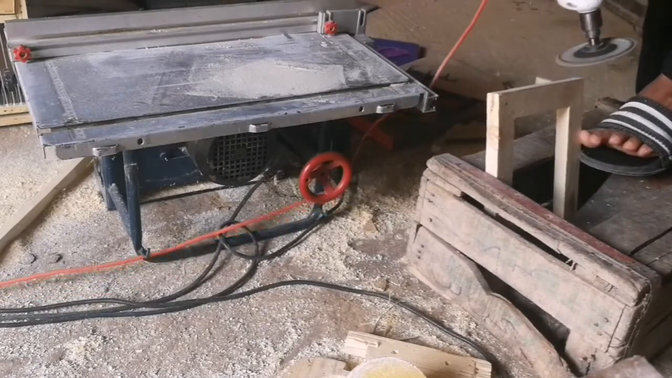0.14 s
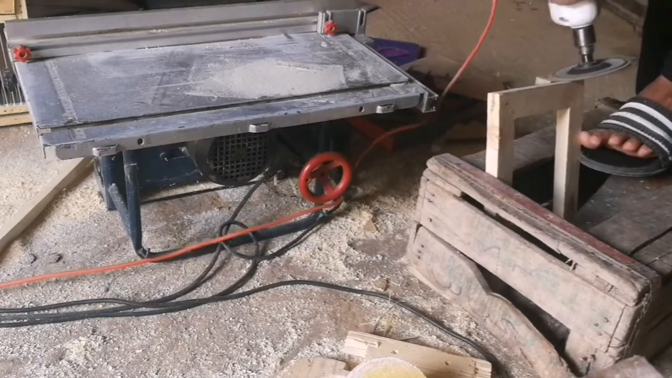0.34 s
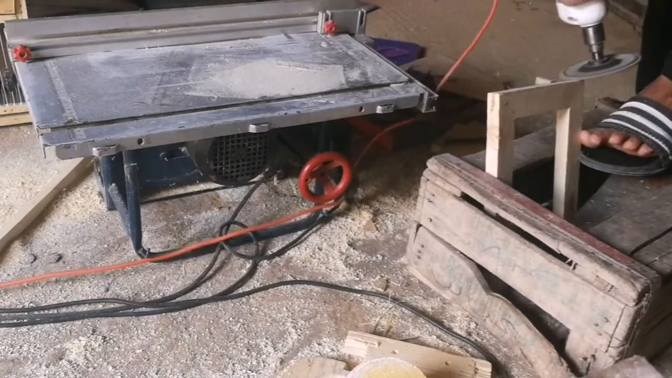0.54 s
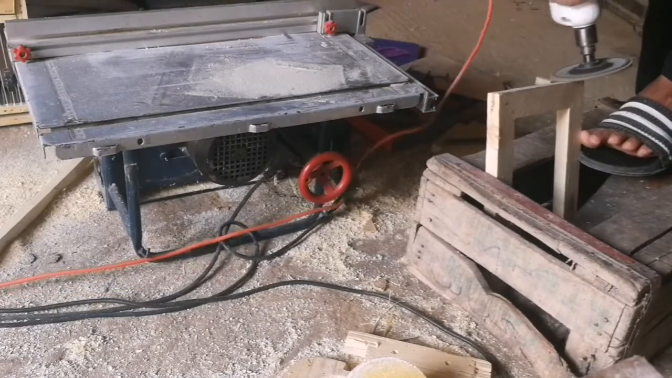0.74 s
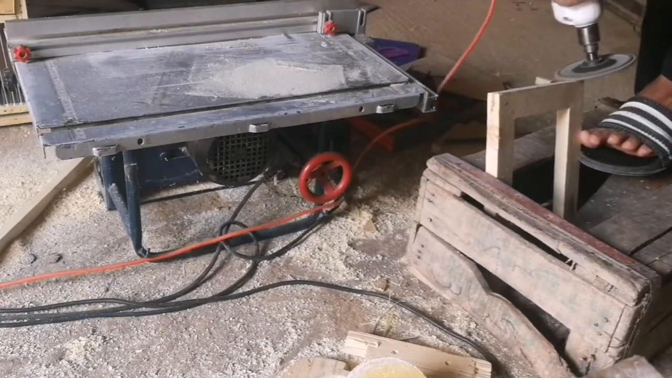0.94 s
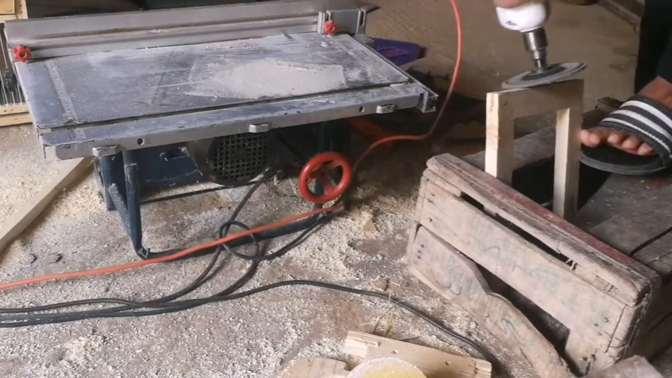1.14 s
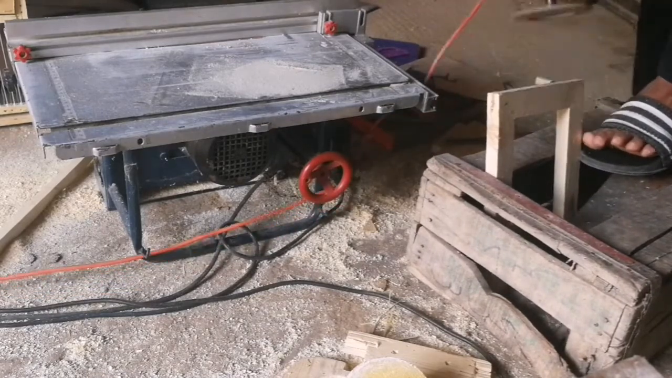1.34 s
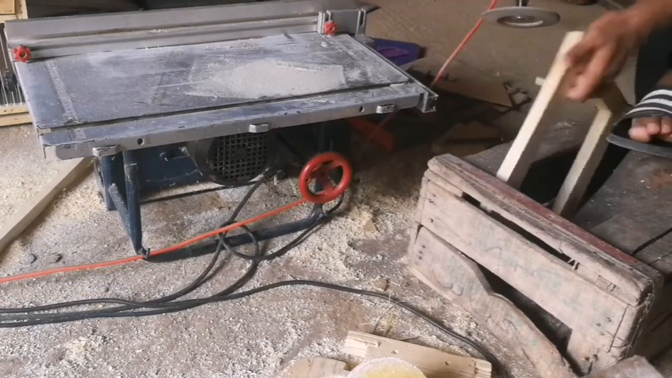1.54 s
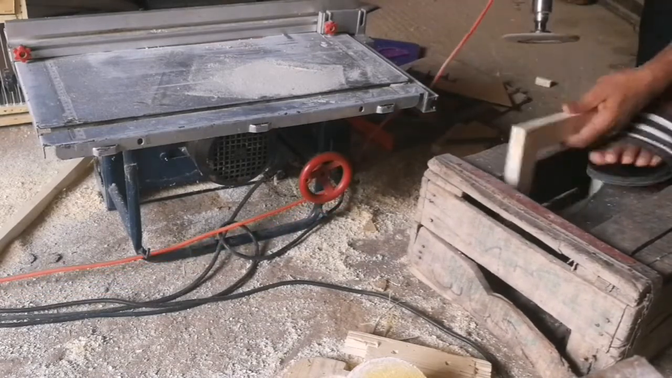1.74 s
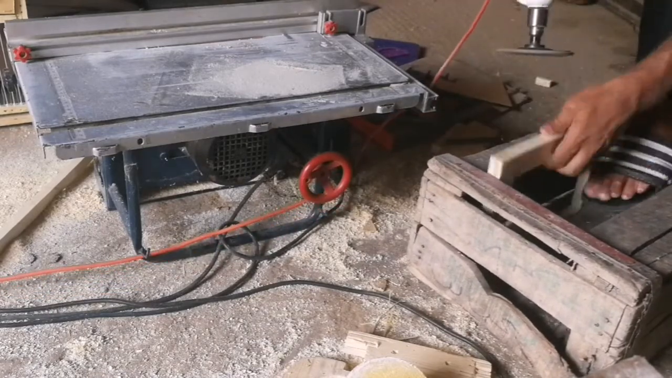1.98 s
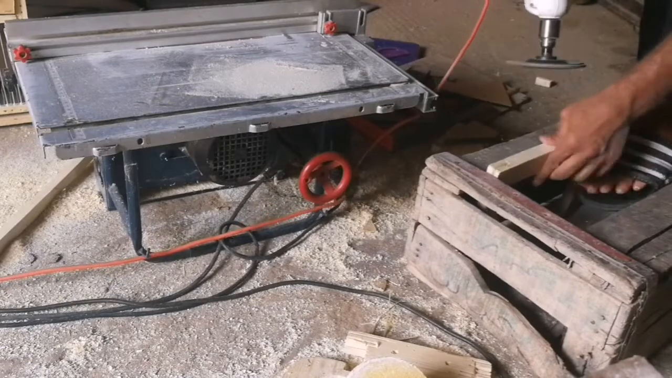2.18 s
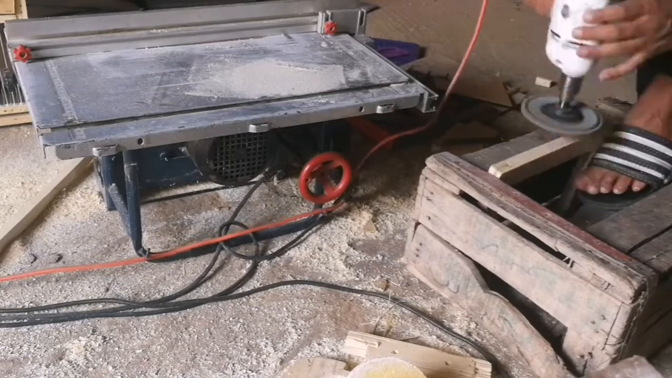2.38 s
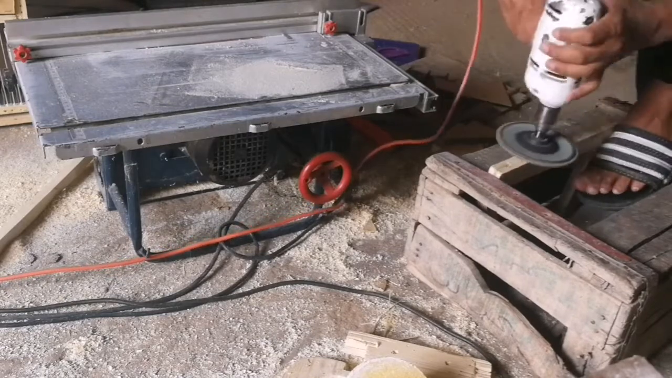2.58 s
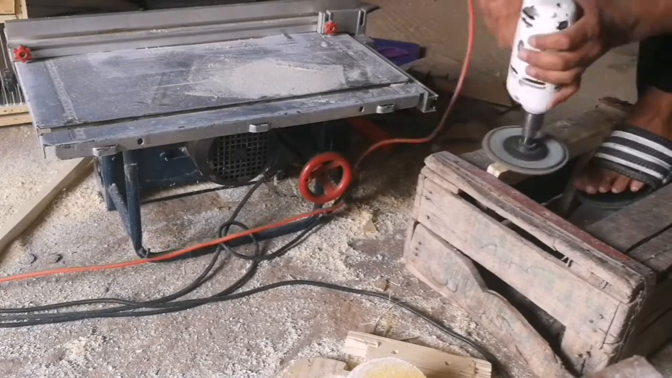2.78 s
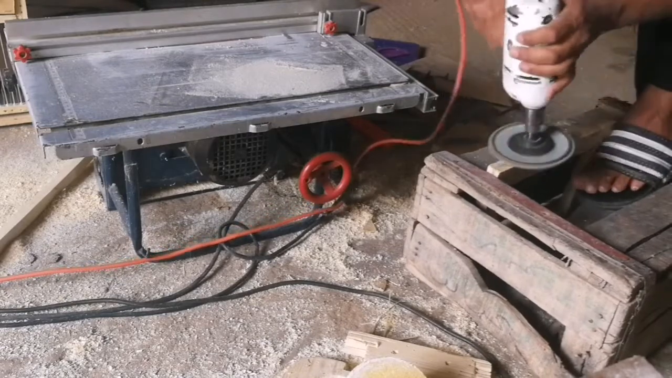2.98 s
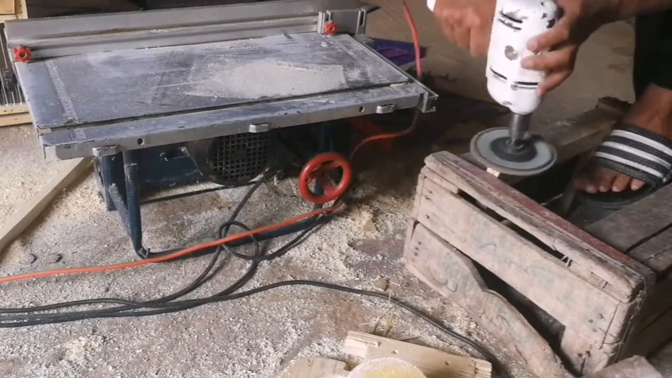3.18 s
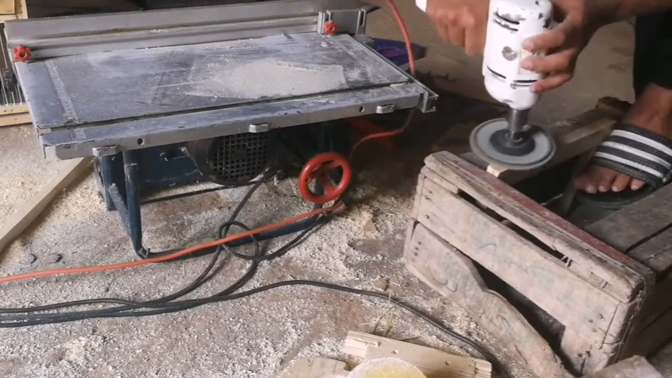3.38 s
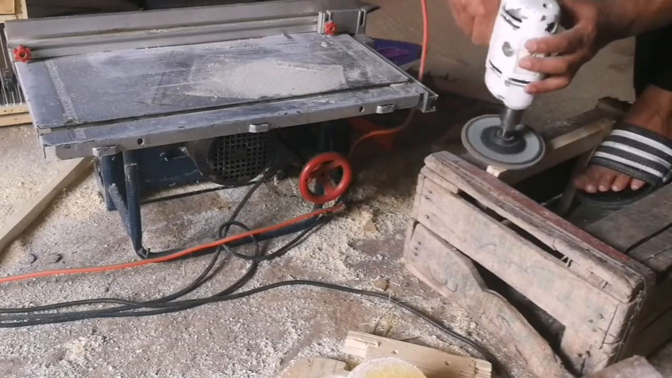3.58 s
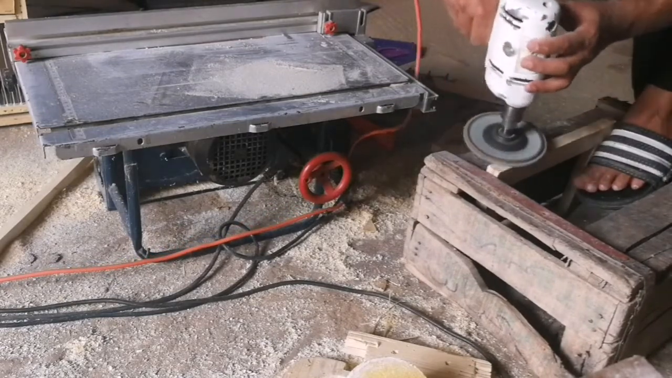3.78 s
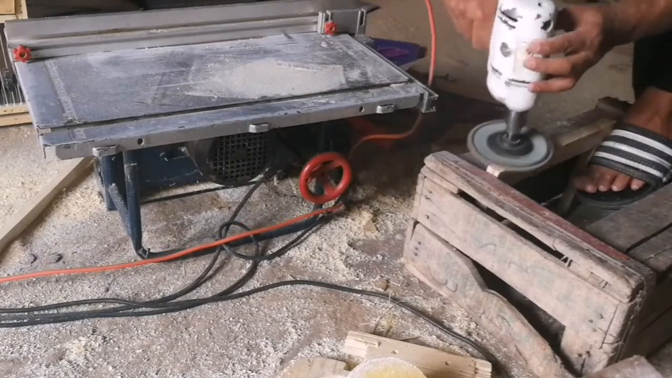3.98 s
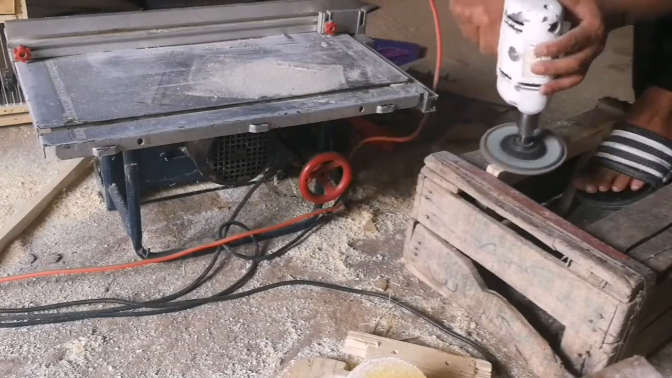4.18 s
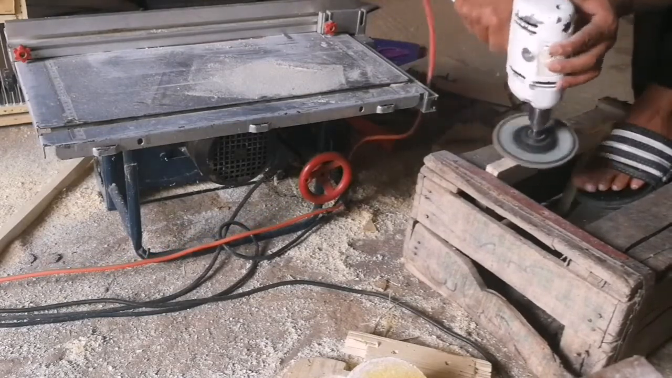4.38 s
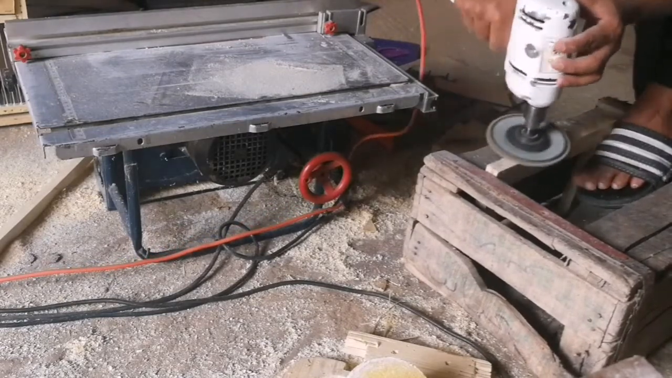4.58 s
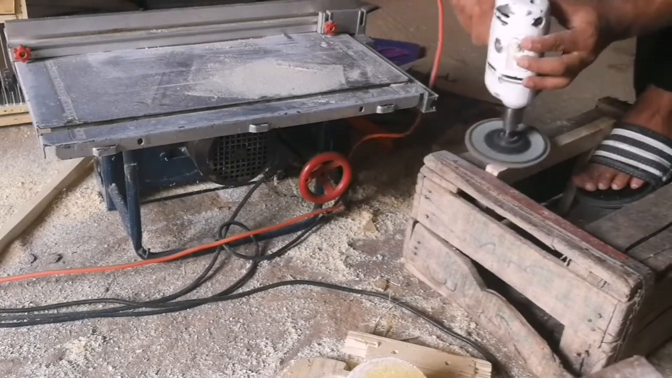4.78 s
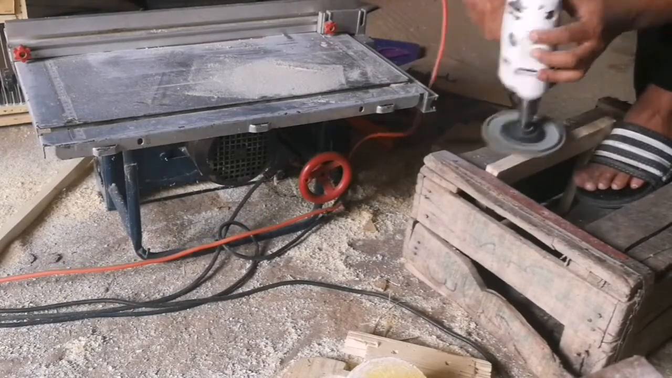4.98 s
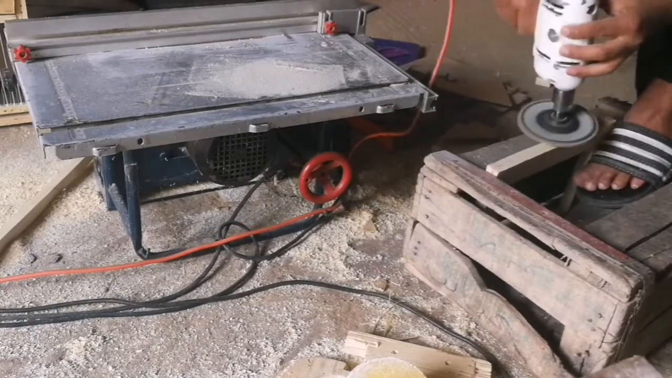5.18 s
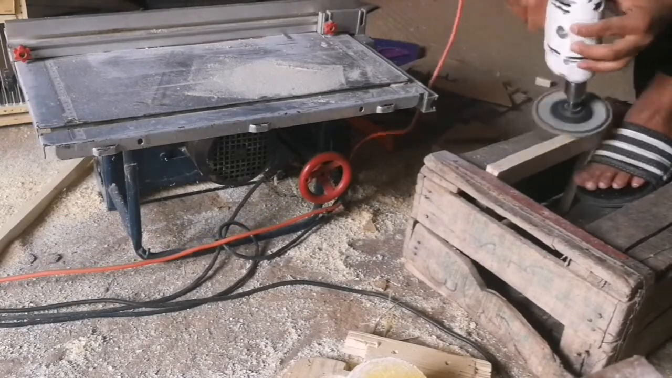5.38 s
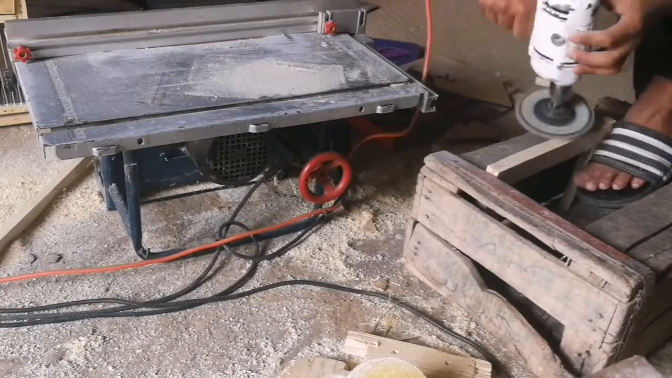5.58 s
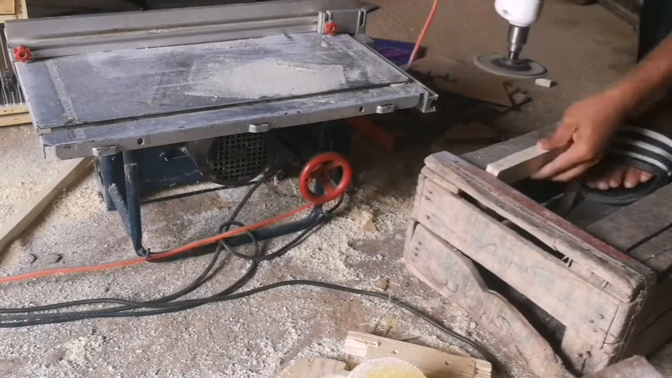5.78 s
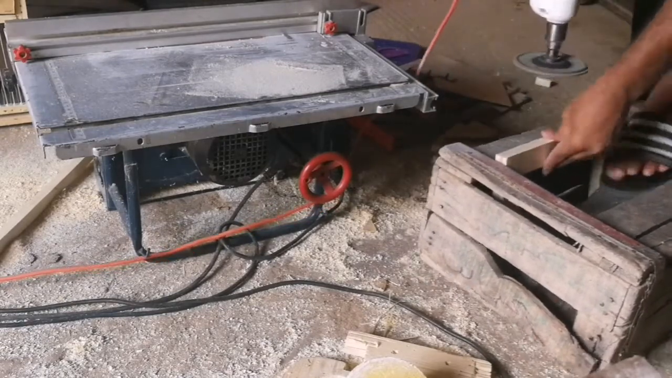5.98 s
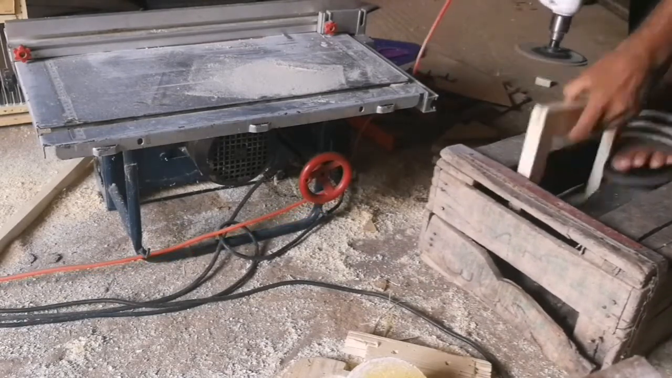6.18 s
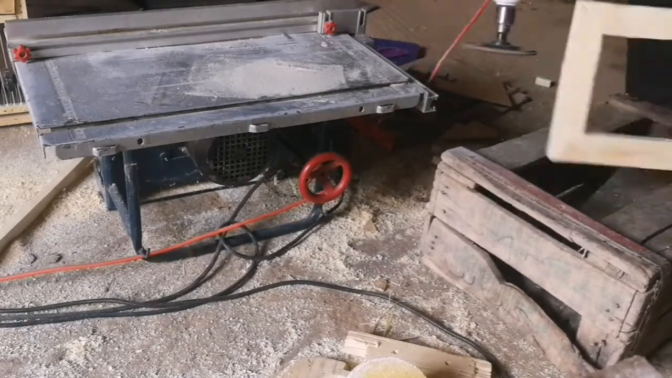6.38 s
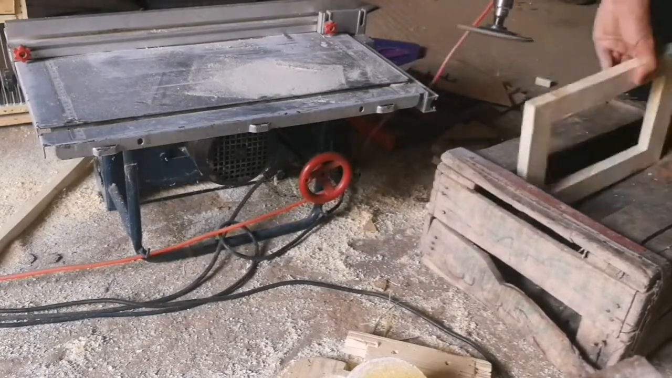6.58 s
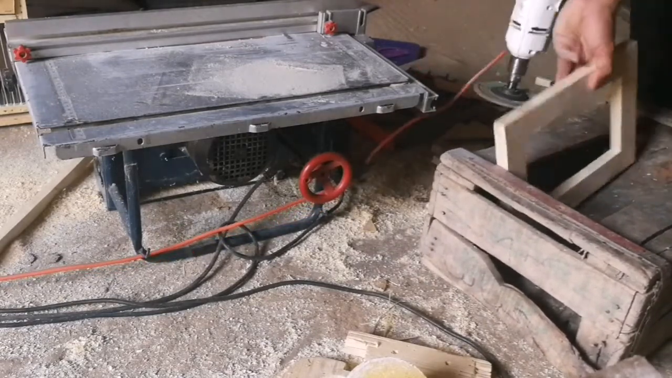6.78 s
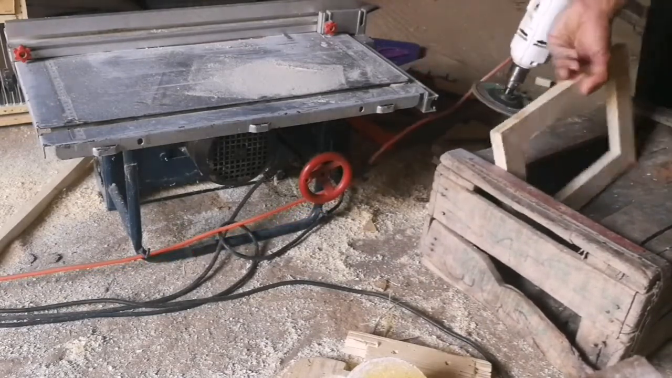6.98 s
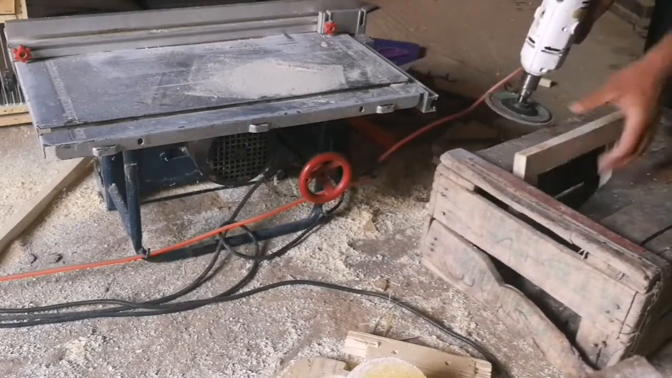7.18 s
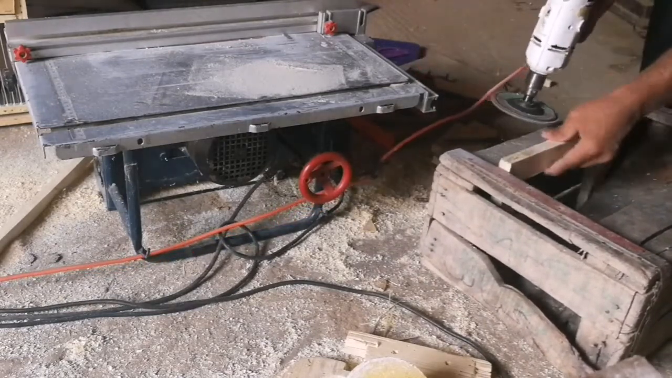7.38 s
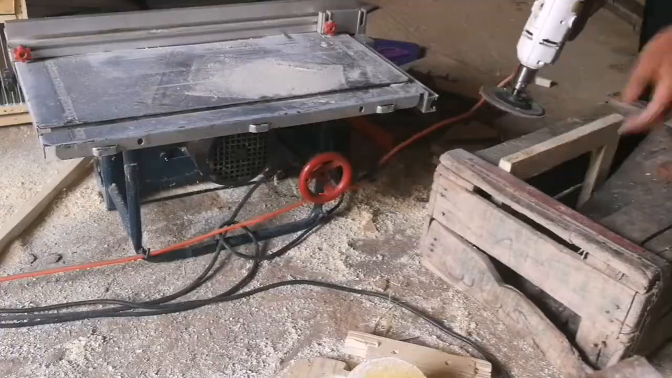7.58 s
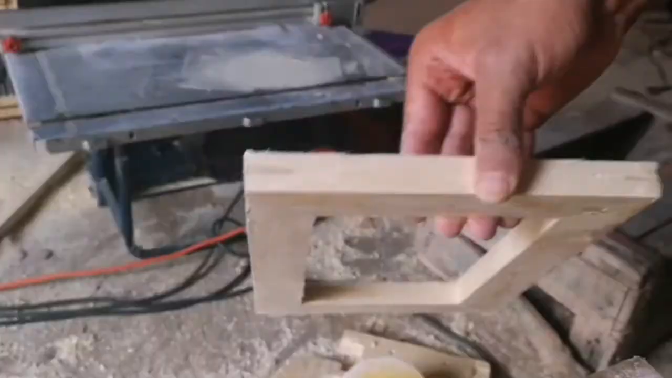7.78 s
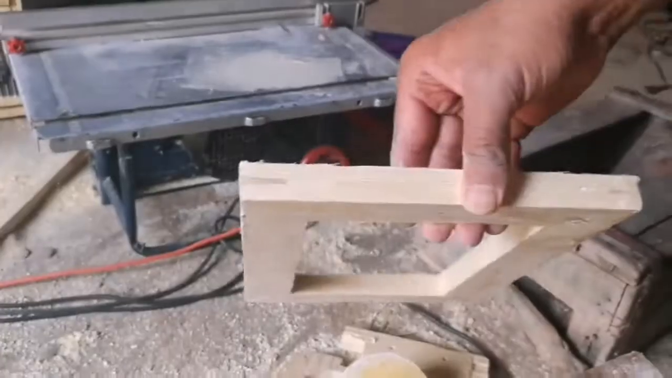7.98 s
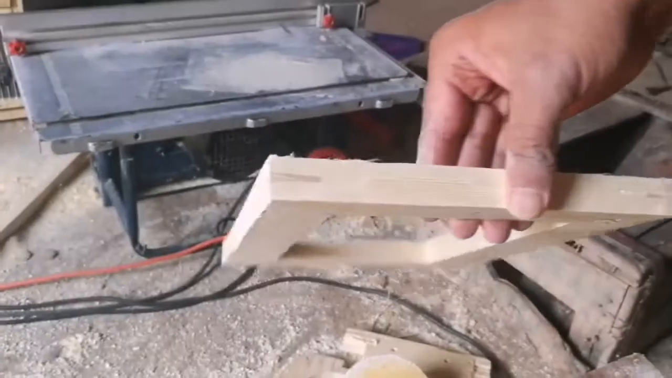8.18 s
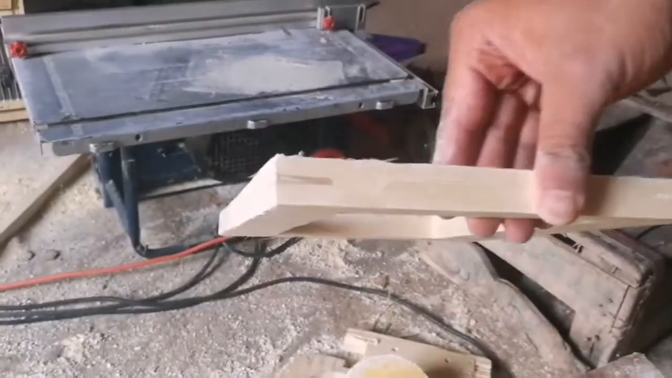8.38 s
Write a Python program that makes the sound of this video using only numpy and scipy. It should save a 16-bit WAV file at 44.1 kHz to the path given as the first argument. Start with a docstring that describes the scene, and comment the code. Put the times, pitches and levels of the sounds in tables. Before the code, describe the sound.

Close to the microphones in a workshop, an electric drill sands wood in two bursts, the second longer than the first. Its motor hums and whines while the disc rasps and the drive gives sharp squeals. Each time the motor coasts down, a small wooden frame bumps on the floor, with several knocks and faint scuffs after the second run. A short silence ends on a low metallic ring.

```python
"""Drill sanding a wooden frame

In a workshop, close to a pair of microphones, an electric drill with a sanding disc runs in two bursts.
Its rotor hums, its fan whines and blows, the grit rasps once a disc turn, the drive squeals under power.
As it coasts the small frame is turned and knocked on the floor.
A brief silence ends on a metal part already ringing."""
import sys
import numpy as np
from scipy import signal
from scipy.fft import rfft, irfft, next_fast_len
from scipy.io import wavfile

SR = 44100
rng = np.random.default_rng(int(sys.argv[2]) if len(sys.argv) > 2 else 0)


def wav_out(sig):
    """Save sig, one row per channel (or a flat mono array), as 16-bit PCM at SR to the path in sys.argv[1]."""
    wavfile.write(sys.argv[1], SR, np.round(np.clip(np.atleast_2d(sig).T, -1, 1) * 32767).astype(np.int16))


N = 372204
TIME = np.arange(N) / SR

# The trigger is held. Each row: on and off in seconds, fan air level at rated speed in dB.
TRIGGER_RUNS = [(-1, 1.3, -37.0), (2.302, 5.6, -35.4)]
# Speed held against the hand's pressure. Each row: time in seconds, rotor speed in Hz.
WORK_SPEED = [(0, 412), (.22, 446), (.3, 440), (.45, 417), (1.0, 400), (1.3, 413), (2.7, 421), (3.05, 396),
              (3.2, 405), (3.85, 380), (4.1, 385), (4.3, 374), (5.0, 387), (5.2, 402), (5.4, 395),
              (5.6, 407)]
# The housing drones as the grip eases.
# Each row: middle and length in seconds, once-a-turn and twice-a-turn hum in dB.
HOUSING_DRONES = [(.15, .24, -42.5, -41), (1.265, .08, -43, -39), (2.58, .09, -48, -38.5),
                  (2.8, .15, -60, -36.5), (3.2, .3, -50, -45), (5.58, .09, -60, -39)]
# The disc is pressed on the wood.
# Each row: start and end in seconds, relative levels of rasp, squeal and its octave in dB.
DISC_STROKES = [(-.1, .035, -40.5, -35, -54), (.255, .43, -38.5, -38, -36), (.43, 1.01, -40.3, -41, -47),
                (1.17, 1.25, -47, -38, -48), (2.41, 2.53, -41, -44, -60), (2.53, 2.64, -40, -30, -48),
                (2.64, 3.0, -45, -35, -41), (3.0, 3.16, -45, -42, -44), (3.16, 3.45, -42, -38.5, -40),
                (3.45, 4.15, -44, -40, -47), (4.15, 4.66, -42.5, -36.5, -46), (4.68, 4.97, -45, -36.5, -43),
                (4.98, 5.08, -39, -36, -46), (5.13, 5.23, -40.5, -36, -50), (5.24, 5.31, -36, -35, -50),
                (5.33, 5.44, -38, -36.5, -52), (5.46, 5.62, -39.5, -41, -52)]
# Loud chirps of the squeal. Each row: middle and length in seconds, level in dB.
SQUEAL_CHIRPS = [(.345, .03, -28), (.394, .019, -25), (1.05, .015, -16), (1.067, .012, -16.3),
                 (1.09, .009, -22.5), (1.112, .014, -16.5), (1.125, .025, -19.5), (2.539, .012, -23),
                 (2.691, .014, -20.5), (2.716, .016, -23.5), (2.745, .008, -18.5), (2.774, .036, -24.5),
                 (2.835, .009, -21), (2.977, .012, -22.5), (3.115, .009, -20.5), (3.183, .006, -23.5),
                 (4.25, .04, -29), (4.577, .01, -23.5), (5.141, .017, -24), (5.217, .02, -25),
                 (5.253, .016, -23), (5.272, .009, -17.5)]
# Dull bumps on the floor boards. Each row: start in seconds, relative level in dB.
FLOOR_BUMPS = [(1.575, -47.5), (1.756, -50), (1.987, -42.5), (2.084, -49.5), (5.815, -40.5), (5.95, -46),
               (6.185, -51), (6.45, -45.5), (6.78, -54), (6.915, -54), (7.079, -42.5)]
# The frame knocks on the floor. Each row: start in seconds, relative level in dB,
# brightness in dB per octave, chatter in seconds, favoured ring in Hz.
FRAME_KNOCKS = [(2.084, -33.5, -1.4, 0.0051, 1100), (2.135, -54.5, -1.5, .012, 1000),
                (6.443, -34, 3.3, 0.0082, 2620), (6.455, -39, 6.5, 0.0089, 1990),
                (6.531, -42, -0.5, 0.035, 1460), (6.658, -37, -4, 0.013, 930),
                (6.772, -33, -3.5, 0.016, 800), (6.858, -42, -2.5, .022, 647),
                (6.909, -28.5, -2, 0.012, 1180), (6.971, -36, -2, 0.022, 950),
                (7.076, -33, -4, 0.0017, 790), (7.087, -39, -6.5, 0.0058, 480),
                (7.268, -32.5, -0.5, 0.0032, 910), (7.283, -32.5, -2, 0.012, 1010)]
# Hands and sandals scuff. Each row: middle and length in seconds, level in dB.
SCUFF_EVENTS = [(6.57, .09, -64), (6.662, .025, -58), (6.77, .014, -49.5), (7.055, .04, -57),
                (7.24, .025, -65), (7.43, 0.073, -70.5), (7.64, .021, -51.5)]
# Modes of the ringing objects. Each row: frequency in Hz, time to fall 60 dB in seconds, level in dB.
BOARD_MODES = [(70, 0.12, -9), (104, 0.14, -12.5), (143.5, 0.17, -3), (248, .12, -0.5), (321, 0.059, 1.5),
               (442, 0.077, 0.5), (620, 0.041, -15), (948, 0.036, 0.5)]
FRAME_MODES = [(275, .1, -7), (335, .1, -12.5), (440, 0.074, -6.5), (520, 0.062, -3), (650, .035, 0),
               (840, 0.059, 1.5), (926, 0.036, 5.5), (1038, 0.11, -5), (1193, .06, -5.5), (1310, .035, -6),
               (1660, .03, -1.5), (1890, .03, -2), (2500, .025, -5.5), (3100, .025, -9), (4450, .03, -21)]
METAL_MODES = [(235, 0.74, -41.5), (274, 1.0, -45.5), (1190, 1.0, -72)]
# Spectra of the noises. Each row: frequency in Hz, relative spectral density in dB.
ROOM_SPECTRUM = [(25, -20.5), (45, -10), (85, -3), (170, -8.5), (500, -10), (700, -17), (1330, -10.5),
                 (1800, -16.5), (2900, -19), (7300, -24), (15500, -31.5)]
AIR_SPECTRUM = [(35, -26.5), (75, -10.5), (130, -14), (235, -5.5), (300, -10.5), (440, -2), (620, -9.5),
                (850, 0), (1130, 4.5), (1600, 1), (2200, -5.5), (3000, -1.5), (4300, -5.5), (6000, -7.5),
                (8700, -3.5), (11000, -11.5), (16000, -16)]
BEARING_SPECTRUM = [(3000, -24), (7500, -16), (8300, -1.5), (8900, 3), (9600, -11), (10300, -16.5),
                    (14000, -19.5), (15500, -8)]
GRIT_SPECTRUM = [(200, -22), (1000, -13), (2200, -5), (3000, 6.5), (4000, 5.5), (5600, 1), (6700, 3),
                 (8200, 1.5), (10300, -4.5), (12000, -2), (16000, 1)]
CRACK_SPECTRUM = [(30, -29.5), (110, -14), (400, 1), (1100, 6.5), (2600, -1.5), (5000, -17), (9000, -33.5),
                  (16000, -40)]
SCUFF_SPECTRUM = [(200, -20), (900, -7), (1500, 0), (2300, -7), (4000, -7.5), (8000, -16.5), (16000, -18)]

RATED_HZ = 400  # rotor turns per second


def undb(db):
    return 10 ** (np.asarray(db) / 20)


def unit(x):
    return x / np.sqrt(np.mean(x ** 2) + 1e-20)


def colour(x, points):
    """Shape a signal by (Hz, dB) points, at unit RMS."""
    hz, db = np.transpose(points)
    size = next_fast_len(len(x) + SR // 10, real=True)
    f = np.maximum(np.arange(size // 2 + 1) * SR / size, 1)
    gain = undb(np.interp(np.log(f), np.log(hz), db))
    return unit(irfft(rfft(x, size) * gain, size)[:len(x)])


def walk(rate):
    """A random curve of unit RMS, wandering at about the rate."""
    steps = TIME * rate * np.pi
    levels = rng.standard_normal(int(steps[-1]) + 2)
    return unit(np.interp(steps, np.arange(len(levels)), levels))


def angle(hz):
    return 2 * np.pi * np.cumsum(hz) / SR


def swell(middle, length):
    """A rounded, flat-topped burst."""
    out, near = np.zeros(N), np.abs(TIME - middle) < 2 * length
    out[near] = np.exp(-np.abs(2 * (TIME[near] - middle) / length) ** 3 / 2)
    return out


def add(out, start, x):
    i = int(start * SR)
    out[i:i + len(x)] += x[:N - i]


def one_pole(x, hz, kind):
    return signal.sosfilt(signal.butter(1, hz, kind, fs=SR, output="sos"), x)


def microphones(direct, walls, lead_ms, pan_db, wet_db):
    """The pair hears source and walls; positive lead and pan make the left earlier and louder."""
    taps = np.arange(-16, 17)
    delayed = np.convolve(direct, np.sinc(taps - lead_ms * SR / 1000) * np.hanning(len(taps)), "same")
    return (np.array([direct, delayed]) + undb(wet_db) * walls) * undb([[pan_db / 2], [-pan_db / 2]])


def place(x, lead_ms, pan_db, wet_db, t60=.06, tail_db=-20, tail_t60=.35, count=3):
    """Set a source before the microphones, with close reflections that shift as tool and hands move."""
    t = TIME[:SR // 4]
    decay = (undb(-60 * t / t60) + undb(tail_db - 60 * t / tail_t60)) * (t > .001)
    paths = rng.standard_normal((count, 2, len(t))) * decay / np.sqrt(np.sum(decay ** 2))
    paths = one_pole(paths, 330, "high")  # the bass reaches both microphones alike
    shares = np.array([walk(2) for _ in range(count)])
    shares /= np.sqrt(np.sum(shares ** 2, axis=0))
    echoes = signal.oaconvolve(np.float32(x[None, None]), np.float32(paths), axes=2)[..., :N]
    walls = np.sum(echoes * shares[:, None], axis=0)
    return microphones(x, walls, lead_ms, pan_db, wet_db)


def rush(spectrum, lead_ms, pan_db, wet_db, grain_db):
    """Grainy noise, heard directly and, scattered by the workshop, differently at each microphone."""
    grains = (rng.standard_normal(N) * undb(grain_db * walk(2500)) for _ in range(3))
    direct, left, right = (colour(x, spectrum) for x in grains)
    return microphones(direct, one_pole([left, right], 380, "high"), lead_ms, pan_db, wet_db)


def room_tone(level_db=-69.8):
    """The workshop's faint, low background, all round the microphones."""
    gain = undb(level_db + .98 * walk(5))
    return gain * rush(ROOM_SPECTRUM, lead_ms=0, pan_db=0, wet_db=2.8, grain_db=0)


def drive(spin_up_s=.065, switch_s=.022, surge_s=.18, let_go_s=.13, drag_s=1.2, friction_hz_per_s=162):
    """The rotor climbs to working speed on a surge of current; drag and friction run it down."""
    work_times, work_hz = np.transpose(WORK_SPEED)
    hz, power, surge, fan_db = np.ones(N), np.zeros(N), np.zeros(N), np.zeros(N)
    for on, off, db in TRIGGER_RUNS:
        running, coasting = np.maximum(TIME - on, 0), np.maximum(TIME - off, 0)
        held_hz = np.interp(np.minimum(TIME, off), work_times, work_hz)
        driven_hz = held_hz * (1 - np.exp(-running / spin_up_s))
        kept = np.exp(-coasting / drag_s)
        hz = np.maximum(hz, driven_hz * kept - friction_hz_per_s * drag_s * (1 - kept))
        live = np.minimum(running / switch_s, 1) ** 2 * np.maximum(1 - coasting / let_go_s, 0)
        power += live
        surge += live * np.exp(-running / surge_s)
        fan_db = np.where(TIME > on, db, fan_db)
    return hz, power, surge, fan_db


def fan_air(speed, turn, surge, fan_db, knee_hz=400, brush_db=-33.5):
    """The fan blows harder with speed, pulsing once a turn; the brushes hiss at the start."""
    flow = speed * np.hypot(RATED_HZ, knee_hz) / np.hypot(speed * RATED_HZ, knee_hz)
    gain = np.hypot(undb(fan_db) * flow ** 2.25, undb(brush_db) * surge)
    gain *= undb(.854 * walk(30)) * (1 + .11 * np.cos(turn))
    air = gain * rush(AIR_SPECTRUM, lead_ms=.059, pan_db=-.45, wet_db=-1.6, grain_db=1.5)
    low = one_pole(air, 2600, "low")
    treble_gain = np.minimum(speed + surge, 1) ** .45  # the top fades faster as the fan slows
    return low + (air - low) * treble_gain


def bearing(speed, surge, hiss_db=-49.8, whistle_db=-46.5, surge_db=18):
    """The bearing hisses, and whistles in a narrow band that sinks a little as the rotor slows."""
    hiss_gain = undb(hiss_db + surge_db * surge + 5.6 * walk(50)) * speed ** 4.1
    hiss = hiss_gain * rush(BEARING_SPECTRUM, lead_ms=.091, pan_db=1.5, wet_db=-1.5, grain_db=2.7)
    whistle_hz = 9180 + 430 * speed ** 2 + 180 * walk(400)
    whistle_gain = undb(whistle_db + surge_db * surge + 3 * walk(60)) * speed ** 1.75
    return hiss, whistle_gain * np.sin(angle(whistle_hz))


def rotor_hum(speed, turn, once_db=-55, twice_db=-51):
    """The rotor hums once and twice a turn, louder where the housing drones."""
    drone = sum(undb(db)[:, None] * swell(middle, length) for middle, length, *db in HOUSING_DRONES)
    once = np.hypot(drone[0], undb(once_db) * speed ** 5) * undb(3 * walk(16))
    once *= np.sin(turn + .34 * walk(30))
    twice = np.hypot(drone[1], undb(twice_db) * speed ** 5) * undb(2.2 * walk(15))
    twice *= np.sin(2 * turn + .3 * walk(40))
    return once + twice


def fan_whine(speed, turn, surge, blades=12, level_db=-42.8, surge_db=-27, housing_hz=2850):
    """The blades whine, swelling as their pitch glides through the housing's resonance."""
    flutter = (1.05 - .15 * speed) * walk(170)
    octaves_off = np.log2(blades * speed * RATED_HZ / housing_hz)
    resonance_db = 5.5 * np.exp(-(octaves_off / .2) ** 2)
    gain = np.hypot(undb(level_db) * speed ** 2.4, undb(surge_db) * surge * speed ** 2)
    return gain * undb(resonance_db + 3 * walk(50)) * np.sin(blades * turn + flutter)


def motor(hz, surge, fan_db):
    """Fan, bearing and rotor turn on one shaft, near the middle of the pair."""
    speed = hz / RATED_HZ
    turn = angle(hz * (1 + .0032 * walk(25)))
    air = fan_air(speed, turn, surge, fan_db)
    hiss, whistle = bearing(speed, surge)
    hum = rotor_hum(speed, turn)
    whine = fan_whine(speed, turn, surge)
    low_tones = place(hum, lead_ms=.08, pan_db=1, wet_db=-3)
    high_tones = place(whistle + whine, lead_ms=.064, pan_db=3.1, wet_db=-3)
    return air + hiss + low_tones + high_tones


def strokes(touch, attack_s=.025, release_s=.045, light_rasp_db=-48.5, light_squeal_db=-45):
    """Each stroke bites, holds and lets go; a light rasp and squeal go on while the disc is driven."""
    gains = np.zeros((3, N))
    for start, end, *db in DISC_STROKES:
        ramp = np.minimum((TIME - start) / attack_s, (end - TIME) / release_s)
        gains += undb(db)[:, None] * np.clip(ramp + .5, 0, 1)
    rasp_gain = np.hypot(gains[0], undb(light_rasp_db) * touch)
    squeal_gain = np.hypot(gains[1], undb(light_squeal_db) * touch)
    return rasp_gain, squeal_gain, gains[2]


def sanding(hz, gain, gear_ratio=9, wobble=.21):
    """Grit tears the fibres in countless scratches, harder once a turn as the disc runs out of true."""
    disc_turn = angle(hz / gear_ratio)
    pressure = gain * (1 + wobble * np.cos(disc_turn)) * undb(7 + 1.1 * walk(22))
    return pressure * rush(GRIT_SPECTRUM, lead_ms=.095, pan_db=1.2, wet_db=-1, grain_db=4)


def squeal(hz, gain, octave_gain, cycles_per_turn=8.45, chirp_cycles_per_turn=8.5):
    """On the left the drive chatters at a pitch tied to its speed, at times locking into a chirp."""
    roughness = .64 * (RATED_HZ / np.maximum(hz, 370)) ** 6  # grows as the load slows the rotor
    phase = angle(hz * cycles_per_turn * (1 + .012 * walk(60))) + roughness * walk(300)
    ragged = gain * undb(4.4 * walk(70)) * np.sin(phase)
    ragged += octave_gain * undb(4.2 * walk(70)) * np.sin(2 * phase + .51 * walk(500))
    chirp_gain = np.max([undb(db) * swell(s, length) for s, length, db in SQUEAL_CHIRPS], axis=0)
    chirps = chirp_gain * np.sin(angle(hz * chirp_cycles_per_turn * (1 + .006 * walk(80))))
    return (place(ragged, lead_ms=.056, pan_db=8.8, wet_db=-1)
            + place(chirps, lead_ms=.066, pan_db=9.2, wet_db=-15.5))


def wood_impact(modes, chatter_s, crack_db, crack_t60=.025):
    """A run of tiny bounces, building and dying away, excites modes and a crack; constant energy."""
    t = TIME[:SR // 4]
    contact = (1 - np.exp(-t / (.17 * chatter_s))) * np.exp(-np.minimum(t / chatter_s, 5) ** 3)
    push = rng.standard_normal(len(t)) * undb(6.1 * rng.standard_normal(len(t))) * contact
    ring = np.zeros(len(t))
    for hz, t60, db in modes:
        decay = undb(rng.normal(db, 1.5) - 60 * t / t60)
        ring += decay * np.cos(2 * np.pi * hz * rng.normal(1, .049) * t + rng.uniform(0, 2 * np.pi))
    crack = colour(rng.standard_normal(len(t)), CRACK_SPECTRUM) * undb(-60 * t / crack_t60)
    response = unit(ring) + undb(crack_db) * unit(crack)
    return .33 * unit(signal.fftconvolve(push, response)[:len(t)])


def floor_bumps():
    """The boards thud under the frame."""
    bumps = np.zeros(N)
    for start, db in FLOOR_BUMPS:
        add(bumps, start, undb(db) * wood_impact(BOARD_MODES, chatter_s=.019, crack_db=-30))
    return bumps


def frame_knocks(ring_db=4.5):
    """Where the frame is struck tilts its spectrum, brighter on the corners, and favours some modes."""
    knocks = np.zeros(N)
    hz = np.geomspace(100, 16000, 32)
    for start, db, brightness, chatter_s, ring_hz in FRAME_KNOCKS:
        hit = wood_impact(FRAME_MODES, chatter_s, crack_db=4)
        tilt_db = brightness * np.clip(np.log2(hz / 1000), -2, 2)
        peak_db = ring_db * np.exp(-(np.log2(hz / ring_hz) / .21) ** 2)
        add(knocks, start, undb(db) * np.std(hit) * colour(hit, np.transpose([hz, tilt_db + peak_db])))
    return knocks


def scuffs():
    """Hands and sandals rub in short, uneven bursts."""
    friction = colour(rng.standard_normal(N), SCUFF_SPECTRUM) * undb(2.5 * walk(150))
    return friction * sum(undb(db) * swell(middle, length) for middle, length, db in SCUFF_EVENTS)


def metal_ring(start_s=8.19):
    """A little to the right, a metal part already rings as the silence ends; two low modes beat."""
    t = np.maximum(TIME - start_s, 0)
    ring = sum(undb(db - 60 * t / t60) * np.sin(2 * np.pi * hz * t) for hz, t60, db in METAL_MODES)
    return place(ring, lead_ms=-.1, pan_db=-3.3, wet_db=-30)


def scene():
    """The trigger sets the speed and the strokes set the contact; the frame is handled after each run."""
    rotor_hz, power, surge, fan_db = drive()
    rasp_gain, squeal_gain, octave_gain = strokes(touch=power * rotor_hz / RATED_HZ)
    disc = sanding(rotor_hz, rasp_gain) + squeal(rotor_hz, squeal_gain, octave_gain)
    room = room_tone()
    drill = motor(rotor_hz, surge, fan_db)
    handling = place(frame_knocks() + floor_bumps() + scuffs(), lead_ms=.043, pan_db=.3, wet_db=-2.5)
    return room + drill + disc + handling + metal_ring()


def record(dry):
    """Both channels drop to silence for a moment, and the highest treble is cut."""
    mute_s, resume_s, edge_s, top_hz = 7.752, 8.189, .002, 15800
    muted = np.clip(np.minimum(TIME - mute_s, resume_s - TIME) / edge_s + .5, 0, 1)
    return signal.sosfilt(signal.ellip(10, .2, 70, top_hz, fs=SR, output="sos"), dry * (1 - muted))


dry = scene()
out = record(dry)
wav_out(out)
```